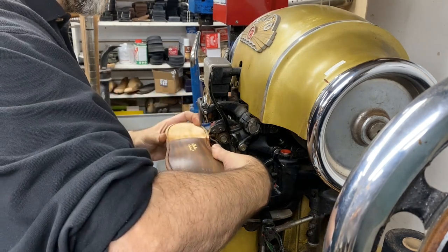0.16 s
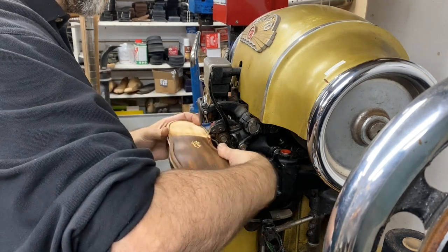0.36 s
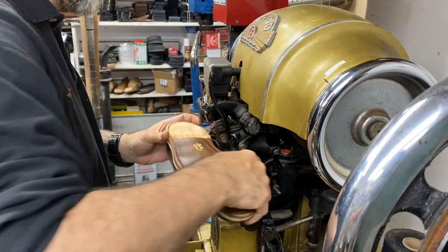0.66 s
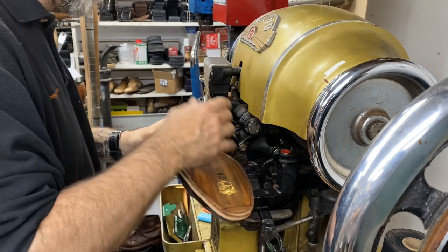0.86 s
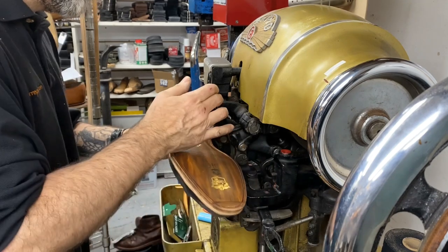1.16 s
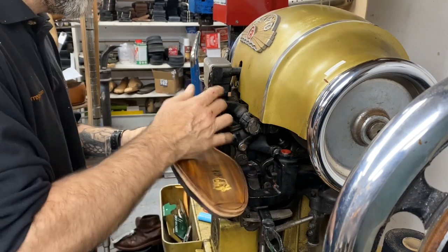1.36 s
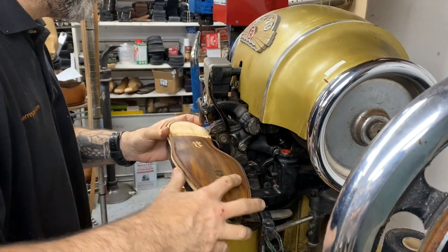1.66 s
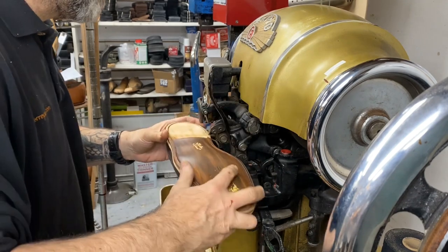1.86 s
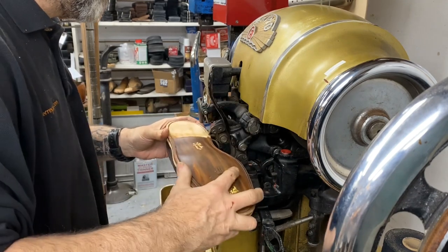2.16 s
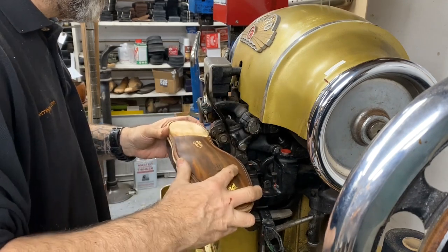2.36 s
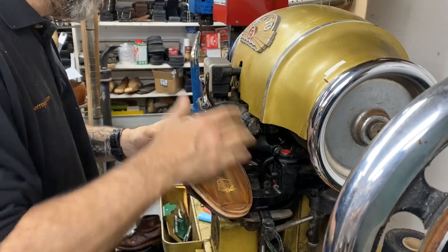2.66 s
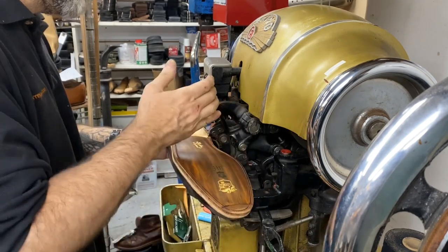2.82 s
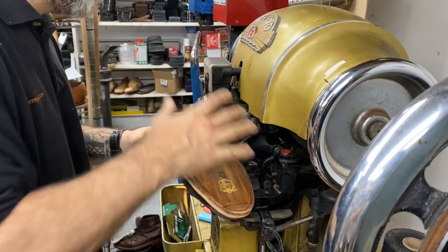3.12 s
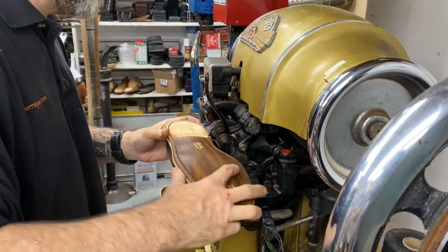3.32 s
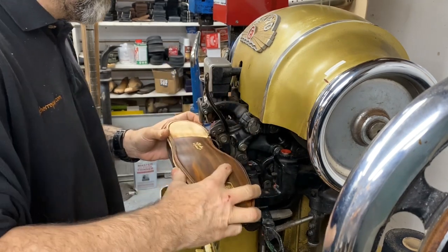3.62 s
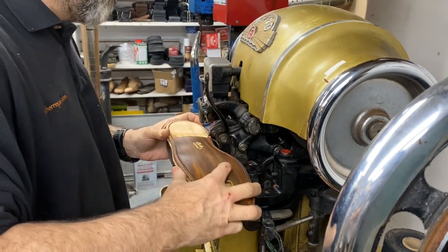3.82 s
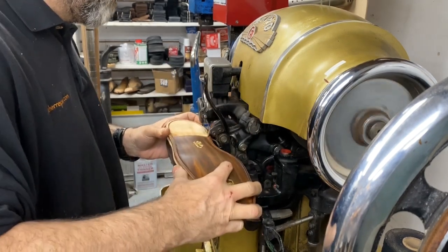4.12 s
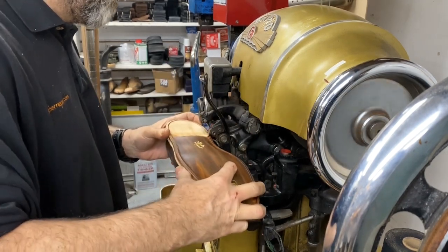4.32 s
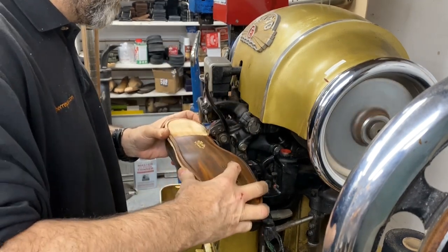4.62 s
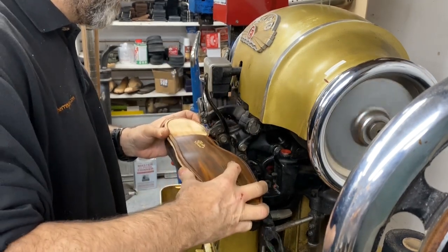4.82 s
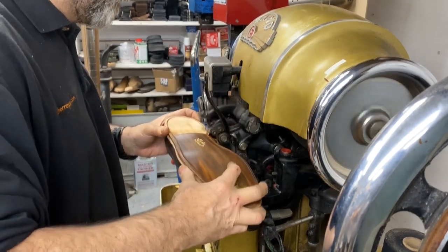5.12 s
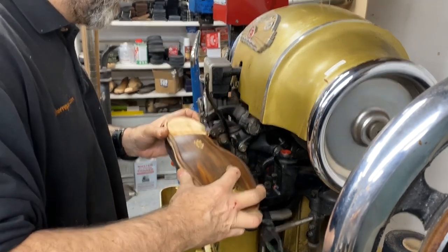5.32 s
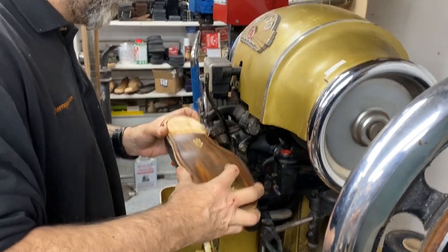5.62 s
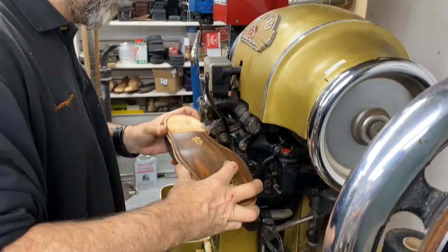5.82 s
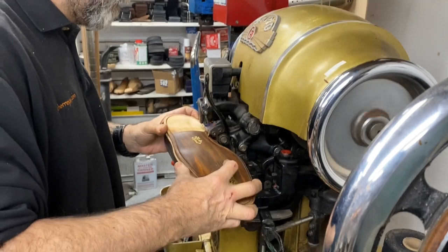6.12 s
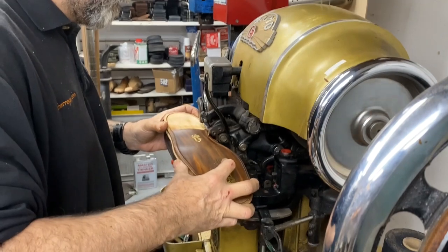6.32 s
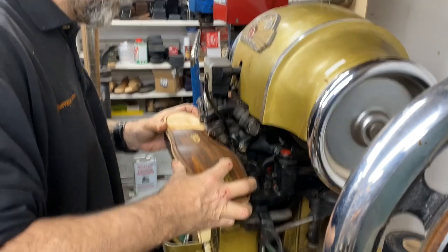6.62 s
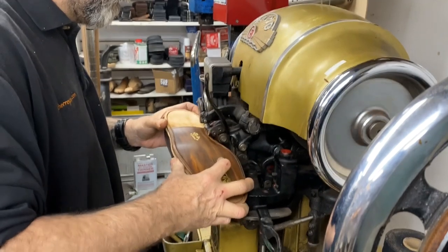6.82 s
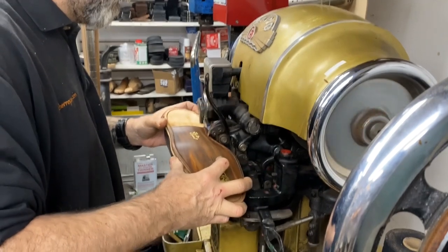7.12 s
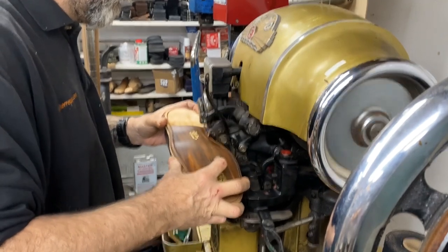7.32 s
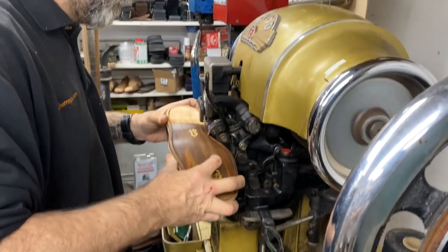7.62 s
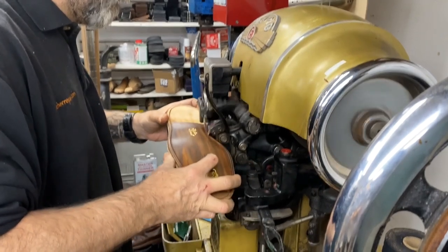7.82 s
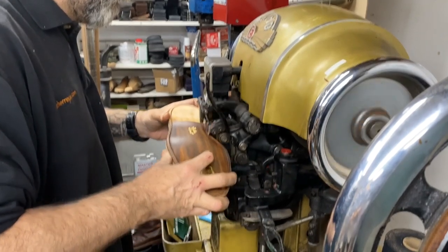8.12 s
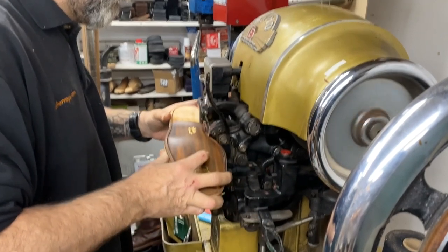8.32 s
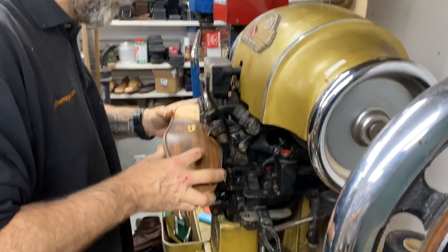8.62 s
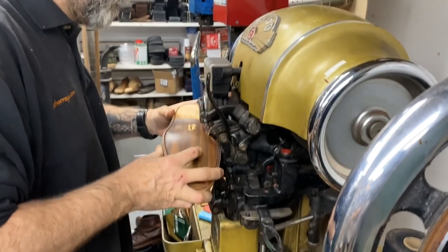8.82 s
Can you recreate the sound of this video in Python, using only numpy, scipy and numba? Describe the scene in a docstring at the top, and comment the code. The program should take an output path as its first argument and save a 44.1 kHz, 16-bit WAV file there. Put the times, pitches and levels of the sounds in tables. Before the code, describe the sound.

A stitching machine idles about a metre from the microphone, its soft hum and thin whine joined by slight cloth rustling. Two quick, loud metal knocks come from a lever, followed by light pedal clicks. Then the mechanism engages and clatters loudly, each stitch a bright snap with ticks and clanks between, over gear noise and a rumbling frame. It gathers speed and keeps running in the small workshop.

```python
"""A small workshop: a heavy sole-stitching machine, a metre from a phone. The motor idles; a lever drops
with a double knock, the pedal engages the clutch, and the cams turn. Once a stitch the take-up snaps and
rings; linkages clack between, gears grind, the cast frame drones and the stand thumps the floor.
The phone lowers its gain under the loudest blows."""
import sys
import numpy as np
from scipy import signal
from scipy.fft import rfft, irfft, next_fast_len
from scipy.io import wavfile
from scipy.ndimage import uniform_filter1d
from numba import njit

SR = 44100
rng = np.random.default_rng(int(sys.argv[2]) if len(sys.argv) > 2 else 0)


def dump(signal):
    """Clip the signal to [-1, 1] and save it as 16-bit WAV at the path in sys.argv[1]."""
    limited = np.clip(np.atleast_2d(signal).T, -1, 1)
    pcm = np.round(limited * 32767).astype(np.int16)
    wavfile.write(sys.argv[1], SR, pcm)


N = 395577
T = np.arange(N) / SR
FFT_SIZE = next_fast_len(N)
BIN_HZ = np.maximum(np.fft.rfftfreq(FFT_SIZE, 1 / SR), 1)
RUN_START_S = 3.86

# take-up snaps: (time [s], level [dB], crack re level [dB], pawl [dB], second push re level [dB])
SNAPS = [(4.382, -7, -15, -25, -10), (4.7662, -6, -17, -23, -6), (5.0809, -5, -13, -19, -1.5),
         (5.3496, -7, -14.5, -29, -5), (5.6499, -10, -9, -31, 1), (5.9342, -5, -16, -26, -4),
         (6.2548, -9, -12, -31, -3), (6.6086, -8, -8.5, -26, -5), (6.842, -7.5, -13, -20, -8),
         (7.059, -10, -13, -21, -11), (7.296, -11, -9.5, -17, -6), (7.549, -8.5, -9, -21, -2),
         (7.7698, -6.5, -9, -20, -11), (8.003, -8, -18, -17, -5), (8.234, -7, -10.5, -24, -14),
         (8.444, -6.5, -12.5, -15.5, -9), (8.657, -10.5, -7.5, -25, -14), (8.87, -9.5, -11, -19, -16)]
# feed cam blows: (time [s], level [dB])
FEED_BLOWS = [(4.226, -20), (4.628, -38), (4.986, -21.5), (5.258, -14), (5.5508, -16.5), (5.84, -16.5),
              (6.14, -20), (6.503, -23), (6.7713, -15), (6.985, -23), (7.216, -21.5), (7.4662, -26),
              (7.703, -18), (7.9159, -32), (8.162, -16.5), (8.372, -21), (8.589, -15.5), (8.797, -18)]
# steel-on-steel spectrum: (frequency [Hz], level [dB])
STEEL_SPECTRUM = [(2500, -0.5), (4000, -1), (6500, -3.5), (9000, -2), (12000, -7), (14500, -6),
                  (16500, -47)]
# casting resonances, body and frame: (frequency [Hz], width [Hz], gain [dB])
BODY_MODES = [(838, 34.6, 22), (1042, 280, 21), (1290, 65, -12), (1480, 430, -1), (1773, 120, 11),
              (1956, 71, 20), (2340, 110, 12.5), (3140, 160, -33), (3900, 220, -11)]
FRAME_MODES = [(191.8, 26, -0.5), (266, 39.6, 1), (294.4, 52, 0.5), (358, 16.3, -3), (406.4, 14, 1.5),
               (583, 85, -8), (711, 160, -10)]


def take_up():
    """A double push rings the arm and cracks; a pawl pings just after. Returns (ringing, crack)."""
    # arm modes: (frequency [Hz], gain [dB], t60 [s])
    arm_modes = [(1061, -22, .06), (1743, -24, .05), (2660, -21, .04), (3300, -5, .018), (3400, -8, .016),
                 (3600, -7, .016), (3695, 0, .019), (3800, -3.5, .015), (4080, -9, .012)]
    push_gap_s, jitter_s, spread_db = .00298, .00003, 3.5
    pawl_lag_turns, pawl_hz, pawl_t60_s = .068, 7300, .031
    s, db, crack_db, pawl_db, again_db = np.transpose(SNAPS)
    grain = rng.standard_normal(N)
    again_s = s + push_gap_s + jitter_s * rng.standard_normal(len(s))
    scatter_db = spread_db * rng.standard_normal((len(s), len(arm_modes))).T
    arm = 0
    for (hz, mode_db, t60_s), offset_db in zip(arm_modes, scatter_db):
        push_db = db + offset_db * (mode_db < 0)  # the strongest mode gets no scatter
        push = blows(s, push_db - 1) + blows(again_s, push_db + again_db)
        push += bursts(s, push_db - 27, .012, .0006) * grain
        arm += undb(mode_db) * ring(resonate(push, [(hz, hz / 5, 0)]), hz, t60_s)
    crack = bursts(s, db + crack_db, .15, .00034) * colour(grit(11, .6), STEEL_SPECTRUM)
    turn_s = np.diff(s, prepend=2 * s[0] - s[1])
    pawl = resonate(blows(s + pawl_lag_turns * turn_s, pawl_db), [(pawl_hz, 400, 0)])
    return arm + ring(pawl, pawl_hz, pawl_t60_s), crack


def linkages():
    """Cams clack their links shut: steel ticks and bounces, the castings answer slower and longer."""
    # blows of three more cams, and of slack in the first turns: (time [s], level [dB])
    awl = [(3.961, -20.5), (4.249, -22), (4.65, -27), (5.0086, -14), (5.282, -16), (5.578, -13.5),
           (5.868, -13), (6.171, -16.5), (6.5364, -16.5), (6.796, -7.5), (7.008, -11.5), (7.24, -15),
           (7.492, -13), (7.7216, -10.5), (7.947, -13), (8.187, -8.5), (8.3963, -11.5), (8.612, -10),
           (8.821, -14)]
    lock = [(4.056, -12.5), (4.374, -19), (4.753, -7), (5.064, -10), (5.333, -12.5), (5.6325, -9.5),
            (5.92, -11), (6.236, -11), (6.5927, -9.5), (7.2759, -20), (7.53, -16), (7.9843, -24)]
    shuttle = [(4.115, -23.5), (4.4844, -19), (4.858, -24.5), (5.1583, -24.5), (5.437, -27.5),
               (5.742, -23.5), (6.0216, -26.5), (6.36, -25.5), (6.681, -19), (6.901, -18), (7.122, -20.5),
               (7.37, -23), (7.614, -17.5), (7.8302, -17.5), (8.073, -22), (8.291, -17), (8.5066, -20.5),
               (8.716, -18.5), (8.933, -17)]
    slack = [(3.934, -23), (4.199, -25.5), (4.337, -45), (4.355, -22), (4.513, -28), (4.672, -25.5),
             (4.71, -22.5)]
    # timbre of feed, awl, lock, shuttle, slack; levels re blow:
    # (body [dB], thud [dB], sheen [dB], t60 [s], clink [Hz], clink [dB], rise [s])
    timbres = [(-3, -6.5, -27, 0.17, 4000, -9, 0.0014), (-4.5, -8, 0, 0.25, 3600, -27, 0.00033),
               (-13, -17.5, -12, 0.074, 2650, -9, 0.00018), (-5.5, -10.5, 13.5, 0.21, 4250, -9, 0.00075),
               (8.5, 2, -20, 0.08, 3400, 6, 0.00039)]
    # steel ticks: (time [s], level [dB])
    ticks = [(3.9353, -36), (3.9624, -15.5), (4.0246, -18), (4.057, -22), (4.0855, -13), (4.1977, -31),
             (4.2257, -19), (4.2483, -14.5), (4.3085, -37), (4.3379, -29), (4.3568, -32), (4.3703, -10),
             (4.4855, -28), (4.515, -23), (4.5579, -35), (4.6292, -30), (4.648, -14), (4.671, -9),
             (4.6996, -17), (4.7545, -18), (4.7879, -19), (4.859, -25), (4.885, -25), (4.9245, -26),
             (4.9766, -15), (4.989, -21), (5.0074, -32), (5.065, -19), (5.0795, -18), (5.158, -31),
             (5.2368, -27), (5.2573, -23), (5.283, -13), (5.3334, -10.5), (5.4633, -29), (5.4977, -36),
             (5.5277, -21), (5.549, -27), (5.5606, -21), (5.5794, -28), (5.635, -7), (5.735, -18),
             (5.8415, -29), (5.868, -25), (5.9183, -14), (6.0211, -21), (6.047, -23), (6.0839, -32),
             (6.14, -33), (6.1722, -24), (6.235, -15.5), (6.2545, -9), (6.3598, -32), (6.382, -22),
             (6.4371, -30), (6.482, -32), (6.501, -24), (6.5174, -16), (6.5377, -25), (6.5923, -26),
             (6.6087, -15), (6.7738, -14), (6.7958, -18), (6.8422, -15), (6.905, -24), (6.9839, -17),
             (7.0103, -12), (7.058, -15), (7.073, -11), (7.1221, -26), (7.216, -16), (7.24, -13),
             (7.276, -13), (7.2965, -12), (7.313, -15), (7.4658, -15), (7.4907, -22), (7.531, -15),
             (7.5494, -12), (7.615, -30), (7.7027, -12), (7.721, -7), (7.7696, -14), (7.9157, -15),
             (7.945, -10), (7.9841, -14), (8.0024, -6), (8.093, -14), (8.1627, -24), (8.184, -16),
             (8.234, -19), (8.2923, -19), (8.3722, -21), (8.396, -17), (8.444, -8), (8.5092, -9),
             (8.59, -20), (8.612, -20), (8.6566, -16), (8.715, -19), (8.798, -14), (8.8202, -14),
             (8.869, -11), (8.93, -23)]
    # top treble of a clack: (frequency [Hz], level [dB])
    sheen_spectrum = [(8500, -30), (10000, 21), (12000, 18), (14500, -24), (16500, -37)]
    groups = zip((FEED_BLOWS, awl, lock, shuttle, slack), timbres)
    rows = [(*blow, *timbre) for table, timbre in groups for blow in table]
    s, db, body_db, thud_db, sheen_db, t60_s, clink_hz, clink_db, rise_s = np.transpose(rows)
    clink_hz = clink_hz * np.exp(.18 * rng.standard_normal(len(s)))
    steel = grit(5.5, .63)
    late, soft = rng.random((len(s), 2, 2)).transpose(1, 2, 0)  # two bounces a clack
    bounce_s = np.minimum(s + .5 * t60_s * late, T[-1])
    envelope = bursts(s, db - 7.5, t60_s, rise_s)
    envelope += bursts(bounce_s, db - 6 - 8 * soft - 15 * late, t60_s=.017, rise_s=.0006)
    envelope += bursts(*np.transpose(ticks), t60_s=.014, rise_s=.00097)
    metal = envelope * colour(steel, STEEL_SPECTRUM)
    sheen = bursts(s, db + sheen_db - 6.5, .034 * t60_s, .00058) * colour(steel, sheen_spectrum)
    body = bursts(s, db + body_db - 9.5, 1.25 * t60_s, .0024) * unit(resonate(grit(5.8, .45), BODY_MODES))
    thud = bursts(s, db + thud_db - 2.5, 2 * t60_s, .0074) * unit(resonate(grit(0, .38), FRAME_MODES))
    return metal + sheen + body + thud + clinks(s, db + clink_db, clink_hz, .3 * t60_s)


def castings():
    """Blows set single modes of frame and head swelling and dying away."""
    # struck modes: (time [s], frequency [Hz], peak [dB])
    frame_rings = [(2.648, 260, -37), (2.739, 250, -36), (2.776, 285, -43), (4.079, 265, -20),
                   (4.196, 280, -25), (4.229, 295, -29), (4.262, 312, -27), (4.291, 378, -25),
                   (4.435, 308, -25), (4.526, 286, -22), (4.616, 296, -25), (4.682, 281, -27),
                   (4.714, 330, -23), (5.193, 302, -28), (5.303, 292, -28), (5.333, 236, -28),
                   (5.541, 293, -23.5), (5.597, 506, -29), (5.615, 250, -21), (5.832, 332, -24),
                   (5.905, 270, -24), (6.131, 280, -23.5), (6.22, 183, -24), (6.545, 267, -34),
                   (6.661, 283, -29), (7.013, 274, -32), (7.097, 202, -21), (7.458, 390, -23),
                   (7.512, 400, -19), (7.734, 403, -16), (7.767, 290, -22), (7.814, 400, -25),
                   (8.186, 413, -39), (8.4, 267, -23), (8.482, 201, -18), (8.634, 257, -21),
                   (8.67, 263, -19.5)]
    head_rings = [(3.9325, 3660, -22), (3.995, 2310, -30), (4.026, 876, -23), (4.368, 1080, -20),
                  (4.369, 1560, -25), (4.375, 1770, -24), (4.651, 1660, -24), (4.711, 2400, -27),
                  (4.72, 860, -21), (4.749, 990, -25), (4.764, 2030, -28), (4.767, 2660, -29),
                  (5.073, 3030, -24), (5.077, 1540, -33), (5.08, 1064, -20), (5.083, 2700, -25),
                  (5.185, 2330, -30), (5.264, 1034, -26), (5.4, 2320, -33), (5.42, 2310, -38),
                  (5.745, 2120, -32), (6.025, 2220, -38), (5.33, 2980, -27), (5.643, 990, -23),
                  (5.841, 1990, -24), (5.87, 1300, -30), (5.878, 865, -25), (5.881, 2040, -22),
                  (5.913, 1860, -26), (5.916, 1010, -19.5), (6.192, 884, -24), (6.231, 1015, -23),
                  (6.249, 1610, -27), (6.25, 2750, -28), (6.389, 2090, -25.5), (6.505, 2360, -29),
                  (6.514, 1900, -25), (6.517, 1490, -27), (6.604, 2700, -24), (6.613, 2440, -33),
                  (6.79, 2700, -31), (6.795, 970, -21), (6.795, 1280, -32), (6.801, 1590, -24),
                  (7.007, 1740, -23), (7.01, 983, -21), (7.01, 1960, -24), (7.01, 2950, -26),
                  (7.292, 2720, -26), (7.545, 1032, -19.5), (7.548, 2660, -22), (7.725, 990, -23),
                  (8.003, 1065, -22), (8.002, 2640, -21), (8.18, 2970, -31), (8.184, 1740, -18),
                  (8.189, 2500, -29), (8.209, 1880, -20), (8.258, 870, -18), (8.392, 1730, -25),
                  (8.399, 950, -23), (8.441, 2010, -30)]
    out, t = np.zeros(N), T[:SR // 8]
    for table, t60_s, rise_s in (frame_rings, .092, .0031), (head_rings, .037, .0037):
        envelope = (1 - np.exp(-t / rise_s)) ** 2 * 1000. ** (-t / t60_s)
        envelope /= envelope.max()
        for (s, hz, db), phase in zip(table, rng.random(len(table))):
            i = int(s * SR)
            out[i:i + len(t)] += (undb(db) * envelope * np.sin(2 * np.pi * (hz * t + phase)))[:N - i]
    return out


def drive():
    """Gear teeth grind, the frame drones in its modes, the stand thumps the floor."""
    # running levels: (time [s], gears [dB], frame [dB], stand [dB])
    levels = [(3.86, -47, -61, -67), (3.89, -52, -41, -58), (3.903, -54, -24, -53), (3.918, -51, -20, -49),
              (3.96, -28.5, -44, -39), (4.0, -27, -30, -32), (4.12, -29.5, -28, -23),
              (4.2, -33.5, -32, -38), (4.38, -28, -31.5, -30), (4.551, -28.5, -29.5, -32.5),
              (4.9, -31, -31, -32), (5.2, -29, -30.5, -27), (5.3, -27.5, -32, -33), (5.4, -36, -40, -31),
              (5.5, -28.5, -35, -36), (5.6, -26, -30, -32), (5.72, -33, -34, -32),
              (5.86, -25.5, -30.5, -33.5), (6.0, -31.5, -33.5, -35), (6.15, -28.5, -34.5, -31.5),
              (6.45, -34, -33.5, -38), (6.7, -23.5, -26.5, -27), (6.85, -22, -32.5, -25.5),
              (7.1, -29, -34, -28.5), (7.25, -28, -32, -30), (7.35, -31, -31.5, -34),
              (7.4, -29.5, -32.5, -31), (7.58, -25, -31.5, -29.5), (7.75, -23, -30, -25),
              (7.92, -26, -30.5, -25.5), (8.1, -26.5, -29.5, -28), (8.4, -24.5, -28, -24.5),
              (8.621, -25.5, -28, -31), (8.75, -28, -31.5, -24), (8.97, -24.5, -29.5, -29)]
    # tooth noise: (frequency [Hz], level [dB])
    grind_spectrum = [(500, 3.5), (900, 5), (2200, 1), (3700, 5.5), (5500, -4), (8000, -4), (11000, -7.5),
                      (14000, -16), (16500, -40)]
    # stand resonances: (frequency [Hz], width [Hz], gain [dB])
    stand_modes = [(59, 200, -17.5), (80.5, 23, 2), (102, 30.5, -2.5), (131, 120, -10)]
    s, *means_db = np.transpose(levels)
    slowness, swings_db = shaft_load()
    grind, drone, thump = (undb(np.interp(T, s, mean_db, left=-99) + swing_db)
                           for mean_db, swing_db in zip(means_db, swings_db))
    teeth = grit(5, .51)
    gears = unit(colour(teeth, grind_spectrum) + .91 * unit(resonate(teeth, BODY_MODES)))
    shake = grit(0, .2)
    lowest_mode = undb(-6.5 * np.log2(slowness)) * resonate(shake, FRAME_MODES[:1])  # grows with speed
    frame = unit(lowest_mode - resonate(shake, FRAME_MODES[1:]))
    rumble = resonate(grit(0, .043), stand_modes)
    stand = unit(resonate(rumble, stand_modes[:1] + stand_modes[2:]))
    return grind * (gears + loose_parts()) + drone * frame + thump * stand


def shaft_load():
    """Load swings round each turn. Returns (relative turn length, dB swings of gears, frame, stand)."""
    # load from the snap on: (phase [turns], gears [dB], frame [dB], stand [dB])
    cycle = [(0, 0.5, -5.5, 0.5), (.12, 1, -1.5, -6.5), (.25, -2, -1.5, -1), (.36, 0.5, 0, -5.5),
             (.46, -4, -1.5, -1), (.56, -3, -0.5, -8.5), (.68, 1.5, -0.5, -1.5), (.8, 0, 1, -6),
             (.92, -1, 1, -0.5)]
    # short turns smooth gears and frame, jolt the stand; exponents: (gears [-], frame [-], stand [-])
    exponents = [1.9, 0.28, -0.91]
    first_feed_s, first_end_s, feed_phase_turns, reference_turn_s = 3.94, 4.07, .635, .25
    shakes_db, shake_hz = (1.5, 1.2, 2), 24.67
    feeds_s = np.r_[first_feed_s, np.transpose(FEED_BLOWS)[0]]
    ends_s = np.r_[first_end_s, np.transpose(SNAPS)[0]]
    ends_s = np.r_[ends_s, 2 * ends_s[-1] - ends_s[-2]]
    k = np.arange(len(feeds_s))
    marks_s = np.r_[np.c_[feeds_s, ends_s[:-1]].ravel(), ends_s[-1]]
    marks_turns = np.r_[np.c_[k + feed_phase_turns, k + 1].ravel(), len(k) + 1]
    turns = np.interp(T, marks_s, marks_turns)
    slowness = np.interp(T, (ends_s[1:] + ends_s[:-1]) / 2, np.diff(ends_s)) / reference_turn_s
    phase, *loads_db = np.transpose(cycle)
    return slowness, [slowness ** p * np.interp(turns, phase, db, period=1) + shake_db * walk(shake_hz)
                      for db, p, shake_db in zip(loads_db, exponents, shakes_db)]


def loose_parts():
    """Small parts jingle at random while the machine runs."""
    # part pitches: (frequency [Hz])
    pitches_hz = [2260, 2240, 3540, 3800, 4550, 4800, 7200, 8000]
    count = 260
    when, which, soft = rng.random((count, 3)).T
    s = RUN_START_S + when * (T[-1] - RUN_START_S)
    hz = np.array(pitches_hz)[(which * len(pitches_hz)).astype(int)]
    return clinks(s, -3 - 8 * soft, hz, t60_s=np.full(count, .03))


def lever():
    """The lever scrapes, hits, hits home and bounces; its bass builds late. Returns (ringing, noise)."""
    # knocks: (time [s], level [dB], crack re level [dB], crack rise [s])
    knocks = [(2.438, -23, 1, 0.0016), (2.4636, -11, 0.5, 0.0017), (2.529, -18.5, -4.5, 0.0021)]
    # lever modes: (frequency [Hz], gain [dB], t60 [s])
    modes = [(84.5, -6.5, 0.19), (215, 1, 0.08), (249, 11.5, 0.14), (296, 1, .05), (418, 6.5, 0.15),
             (568, -5.5, 0.2), (678, 6.5, 0.045), (818, -9, .18), (860, -19, 0.55), (1073, -4, 0.1),
             (1135, -4, .15), (1450, -5.5, 0.16), (1583, -6, .05), (1810, -15, 0.12), (2750, -13, 0.08),
             (3460, -7, .08)]
    # slide to the stop: (time [s], rms [dB])
    scrape = [(2.375, -59), (2.39, -45), (2.425, -42), (2.441, -29), (2.45, -70)]
    # catch resonances: (frequency [Hz], width [Hz], gain [dB])
    catch_modes = [(1780, 4600, 7), (2770, 170, 7), (5100, 150, -5), (6960, 9000, -5)]
    # crack: (frequency [Hz], level [dB])
    crack_spectrum = [(600, 5.5), (2700, -1), (6000, -7), (16000, -22.5)]
    s, db, crack_db, rise_s = np.transpose(knocks)
    push = blows(s, db - 33) + blows(s + .0063, db - 2.5)  # a faint touch, the main push 6 ms later
    ringing = sum(undb(mode_db) * ring(resonate(push, [(hz, hz / 2.9, 0)]), hz, t60_s)
                  for hz, mode_db, t60_s in modes)
    crack = bursts(s, db + crack_db + 5, .12, rise_s) * colour(grit(3.4, .77), crack_spectrum)
    slide_db = np.interp(T, *np.transpose(scrape), left=-99, right=-99)
    return ringing, crack + undb(slide_db) * unit(resonate(grit(1.6, .71), catch_modes))


def clutch():
    """A groan that falls as the plates grip."""
    # groan: (time [s], frequency [Hz], rms [dB])
    groan = [(3.885, 240, -33), (3.915, 209, -35), (3.94, 143, -32.5), (3.964, 119, -25.5),
             (4.0, 94.5, -48), (4.05, 79, -33), (4.09, 80, -50)]
    s, hz, db = np.transpose(groan)
    cycles = np.cumsum(np.interp(T, s, hz)) / SR
    return sine(2 * np.pi * cycles, np.interp(T, s, db, left=-99, right=-99))


def pedal():
    """Treadle rods click dully and stir the castings."""
    # clicks: (time [s], level [dB], body re level [dB], thud re level [dB], t60 [s],
    # clink [Hz], clink re level [dB])
    clicks = [(3.2445, -49.5, 3, 0, 0.23, 2080, -10), (3.6044, -56, 16, 1, 0.11, 1540, 12),
              (3.6255, -35, -13, 1, 0.2, 1225, -2), (3.7854, -37.5, 2.5, 3.5, 0.22, 1150, 6),
              (3.813, -37.5, 3, 14.5, 0.034, 2250, 7), (3.877, -33.5, -7, -5, 0.12, 2660, -12)]
    # rod noise: (frequency [Hz], level [dB])
    rod_spectrum = [(1200, -9), (2200, 2.5), (4000, 0.5), (5600, -4), (6500, -10.5), (11000, -15),
                    (16500, -34)]
    s, db, body_db, thud_db, t60_s, clink_hz, clink_db = np.transpose(clicks)
    rod = bursts(s, db + 2.5, t60_s, .00069) * colour(grit(2.4, .62), rod_spectrum)
    body = bursts(s, db + body_db - 4, 3.2 * t60_s, .0024) * unit(resonate(grit(2.7, 1), BODY_MODES))
    thud = bursts(s, db + thud_db - .5, 2.2 * t60_s, .0057) * unit(resonate(grit(0, .22), FRAME_MODES))
    return rod + body + thud + clinks(s, db + clink_db, clink_hz, .79 * t60_s)


def motor():
    """Mains and shaft tones, one wavering hum, drifting bearing tones and a whine."""
    # mains and shaft: (frequency [Hz], rms [dB])
    tones = [(50.2, -53.5), (58.7, -54.5), (94, -61), (120, -52.5), (125.2, -59), (130, -53.5), (145, -62),
             (159.3, -63), (240, -63), (278, -64), (360, -61), (487, -64), (600, -67), (716, -68.5)]
    # housing and bearings: (frequency [Hz], width [Hz], rms [dB])
    bands = [(52.6, 16, -67), (130, 40, -55), (159.5, 21, -61), (868, 14, -69.5), (975, 11, -67),
             (1134, 24, -66.5), (1276, 3.5, -64), (1306, 8.2, -70), (1547, 24, -69.5), (1666, 16, -67),
             (1912, 24, -70), (2080, 24, -73), (2417, 7, -71), (2470, 12, -73), (2680, 16, -71),
             (3408, 30, -76), (3499, 14, -75), (3890, 70, -72), (4780, 150, -79)]
    # whine: (time [s], rms [dB])
    whine_levels = [(0, -66), (1.0, -62), (1.35, -60), (1.8, -61.5), (2.3, -62), (3.9, -61.5)]
    hum_hz, wobble_hz = 170.35, 5.1
    steady = sum(sine(2 * np.pi * (hz * T + rng.random()), db) for hz, db in tones)
    wobble_rad = 2 * np.pi * (wobble_hz * T + rng.random())
    hum = (1 - .25 * np.cos(wobble_rad)) * sine(2 * np.pi * hum_hz * T + np.sin(wobble_rad), -51.5)
    bearings = sum(undb(db + 1.2 * walk(rate_hz=1.5)) * noise_band(hz, width) for hz, width, db in bands)
    whine = undb(np.interp(T, *np.transpose(whine_levels))) * noise_band(hz=1809, width_hz=12)
    return steady + hum + bearings + whine


def belt():
    """The joint knocks the pulley once a lap."""
    # pulley resonances: (frequency [Hz], width [Hz], gain [dB])
    pulley_modes = [(58, 9.3, -14), (93, 15, -5), (288, 8, 4.5), (394, 20, 0), (468, 22, -13),
                    (596, 19, -6.5)]
    lap_hz, rms_db = 11.74, -50
    s = np.arange(.052, T[-1], 1 / lap_hz)
    joint = blows(s, 2.5 * rng.standard_normal(len(s)))
    return undb(rms_db) * unit(resonate(joint, pulley_modes))


def rustle():
    """Sleeves and leather: each hand move swells, holds and fades."""
    # moves: (time [s], length [s], rms [dB])
    moves = [(.39, 0.35, -62.5), (0.806, 0.051, -61), (1.347, 0.042, -58.5), (1.797, 0.031, -60),
             (1.89, 0.04, -61), (2.723, 0.17, -61), (3.25, 0.02, -60), (3.45, .08, -64)]
    # cloth noise: (frequency [Hz], level [dB])
    cloth_spectrum = [(1500, 0), (3000, 2), (5000, -7.5), (8000, -6.5), (12000, -11.5), (16500, -24)]
    rise_s, fall_s, floor_db = .013, .033, -67
    power = undb(floor_db) ** 2 * (T < RUN_START_S)
    for s, length_s, db in moves:
        fade = np.maximum((s - T) / rise_s, (T - s - length_s) / fall_s)
        power += (undb(db) * np.exp(-np.maximum(fade, 0))) ** 2
    return np.sqrt(power) * colour(grit(1.3, .07), cloth_spectrum)


def shop_air():
    """Steady room noise, its bass alike left and right."""
    # air: (frequency [Hz], level [dB])
    air_spectrum = [(20, -23), (45, 0), (170, -3), (300, -3.5), (700, -8.5), (930, -16), (1100, -15),
                    (2500, -20.5), (2800, -27), (5000, -30), (8000, -61), (12000, -75), (16500, -62)]
    mid, side = (colour(rng.standard_normal(N), air_spectrum) for _ in range(2))
    side = signal.lfilter(*signal.butter(1, 350, "high", fs=SR), 1.18 * side)
    return undb(-49) * np.array([mid + side, mid - side])


def room(x):
    """Direct sound plus a dense stereo tail whose top dies first."""
    # tail bands: (frequency [Hz], t60 [s], level re direct [dB])
    bands = [(98, 1, -29), (390, 0.26, -10.5), (1370, 0.14, -4.5), (4000, 0.29, -15.5),
             (10300, 0.023, -12.5)]
    t, tail = T[:SR // 2], 0
    for hz, t60_s, db in bands:
        bandpass = signal.butter(1, [hz / 2, min(hz * 2, .45 * SR)], "band", fs=SR)
        band = signal.lfilter(*bandpass, rng.standard_normal((2, len(t))))
        fade = decay(t, t60_s, rise_s=.00045)
        tail += undb(db) * band * fade / np.sqrt(np.sum(fade ** 2))
    return x + signal.fftconvolve(x.mean(axis=0, keepdims=True), tail, axes=1)[:, :N]


def clinks(s, db, hz, t60_s):
    """Each struck part chatters briefly round its own pitch."""
    out, t = np.zeros(N), T[:SR // 20]
    for start_s, gain, part_hz, length_s in zip(s, undb(db), hz, t60_s):
        i = int(start_s * SR)
        tone = noise_band(part_hz, part_hz / 64, len(t)) * decay(t, length_s, rise_s=.00024)
        out[i:i + len(t)] += gain * tone[:N - i]
    return out


def grit(spread_db, stereo_width):
    """Dense tiny impacts of uneven size across the machine; rms 1."""
    mid, side = rng.standard_normal((2, N))
    size = undb(spread_db * np.minimum(rng.exponential(size=N), 4))
    return unit((mid + stereo_width * side * np.array([[1], [-1]])) * size)


def decay(t, t60_s, rise_s):
    """Quick rise, exponential fall."""
    return (1 - np.exp(-t / rise_s)) * 1000. ** (-t / t60_s)


def bursts(s, db, t60_s, rise_s):
    """Envelope of decaying blows, summed as power."""
    power = np.zeros(N)
    for start, gain, length, rise in np.broadcast(s, undb(db), np.clip(t60_s, .005, .6), rise_s):
        i = int(start * SR)
        t = T[:min(int(length * SR), N - i)]
        power[i:i + len(t)] += (gain * decay(t, length, rise)) ** 2
    return np.sqrt(power)


def blows(s, db):
    """One impulse a blow."""
    x = np.zeros(N)
    x[(np.asarray(s) * SR).astype(int)] = undb(db)
    return x


def ring(x, hz, t60_s):
    """One decaying mode; a unit blow peaks near 1."""
    pole = np.exp(2j * np.pi * hz / SR - np.log(1000) / (t60_s * SR))
    return signal.lfilter([0, pole.imag], [1, -2 * pole.real, abs(pole) ** 2], x)


def resonate(x, peaks):
    """Parallel resonances of alternating sign: (frequency [Hz], width [Hz], gain [dB])."""
    return sum((-1) ** k * undb(db) * signal.lfilter(*signal.iirpeak(hz, hz / width_hz, SR), x)
               for k, (hz, width_hz, db) in enumerate(peaks))


def noise_band(hz, width_hz, samples=N):
    """Noise through one resonance; rms 1."""
    return unit(resonate(rng.standard_normal(samples), [(hz, width_hz, 0)]))


def colour(x, spectrum):
    """Shape by (frequency [Hz], level [dB]); rms 1."""
    gain = undb(per_bin(spectrum)) * (BIN_HZ > spectrum[0][0] / 2)
    return unit(irfft(rfft(x, FFT_SIZE) * gain, FFT_SIZE)[..., :N])


def per_bin(table):
    """A (frequency [Hz], value) table at each FFT bin."""
    hz, value = np.transpose(table)
    return np.interp(np.log(BIN_HZ), np.log(np.maximum(hz, 1)), value)


def walk(rate_hz):
    """Random steps, smoothed twice; rms 1."""
    hold = int(SR / rate_hz)
    steps = np.repeat(rng.standard_normal(N // hold + 1), hold)
    return unit(uniform_filter1d(uniform_filter1d(steps, hold), hold)[:N])


def sine(phase_rad, rms_db):
    return np.sqrt(2) * undb(rms_db) * np.sin(phase_rad)


def undb(db):
    return 10 ** (np.asarray(db) / 20)


def unit(x):
    return x / np.sqrt(np.mean(x ** 2))


@njit
def follow(x, attack_s, release_s):
    """One-pole envelope follower."""
    envelope, level = np.empty(len(x)), 0.
    for i in range(len(x)):
        level += (x[i] - level) / (SR * (attack_s if x[i] > level else release_s))
        envelope[i] = level
    return envelope


def scene():
    """The machine sounds through the room, over its air."""
    idle, air, cloth = motor() + belt(), shop_air(), rustle()
    arm_ring, arm_crack = take_up()
    lever_ring, lever_noise = lever()
    ringing = arm_ring + lever_ring
    wet = undb(-11)  # arm and lever rings stay mostly dry, short and clear
    machine = arm_crack + lever_noise + linkages() + castings() + pedal() + drive() + clutch() + idle
    return (1 - wet) * ringing + room(wet * ringing + machine + cloth) + air


def record(dry):
    """Left and right partly share the treble; gain ducks after loud blows; soft clip, low-pass."""
    # left heard in the right: (frequency [Hz], power share [-])
    crosstalk = [(5500, 0.01), (7200, .3), (16000, .3)]
    # stereo balance: (frequency [Hz], left minus right [dB])
    balance = [(60, 0.4), (1000, 0), (2500, 3), (5000, 3.5), (7000, 2.5), (12000, 1.5)]
    # stereo phase, turning in steps through the treble: (frequency [Hz], left lead [rad])
    phase = [(60, 0), (1200, -.2), (2900, .8), (3900, .3), (7300, 0), (8500, -2.9), (9500, -3.3),
             (10700, -6), (11600, -6.5), (12800, -9.2), (13800, -9.6), (14900, -12.4), (16500, -12.6)]
    threshold_db, ratio, ceiling, cutoff_hz = -14, 2.1, 1.05, 16550
    left, right = rfft(dry, FFT_SIZE)
    share = np.clip(per_bin(crosstalk), 0, 1)
    right = np.sqrt(share) * left + np.sqrt(1 - share) * right
    skew = undb(per_bin(balance) / 2) * np.exp(.5j * per_bin(phase))
    stereo = irfft(np.array([left * skew, right / skew]), FFT_SIZE)[:, :N]
    level = follow(np.abs(stereo).max(axis=0), attack_s=.018, release_s=.15)
    gain = np.minimum(1, undb(threshold_db) / (level + 1e-9)) ** (1 - 1 / ratio)
    lowpass = signal.ellip(12, .2, 85, cutoff_hz, fs=SR, output="sos")
    return signal.sosfilt(lowpass, ceiling * np.tanh(stereo * gain / ceiling))


dry = scene()
out = record(dry)
dump(out)
```